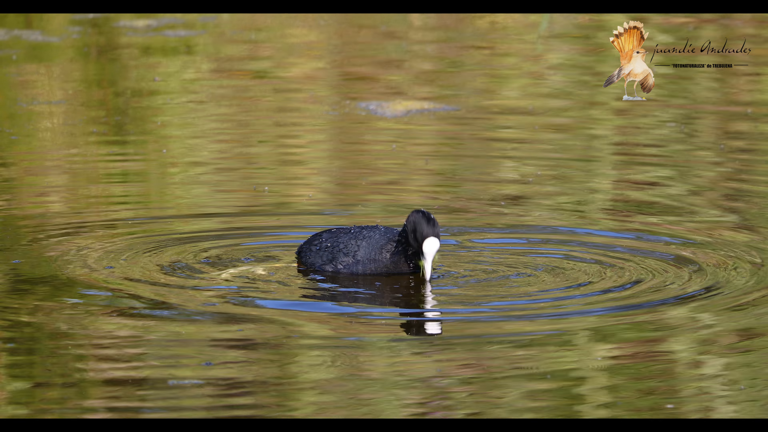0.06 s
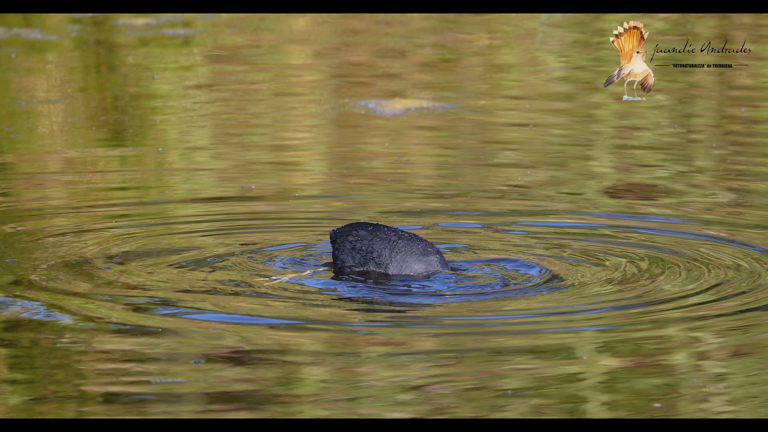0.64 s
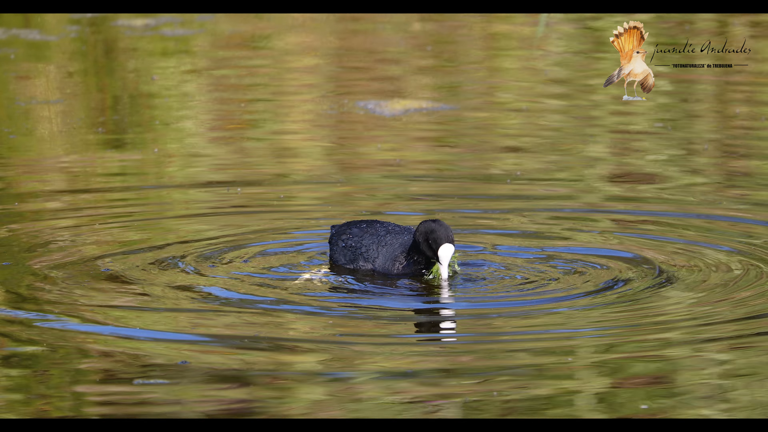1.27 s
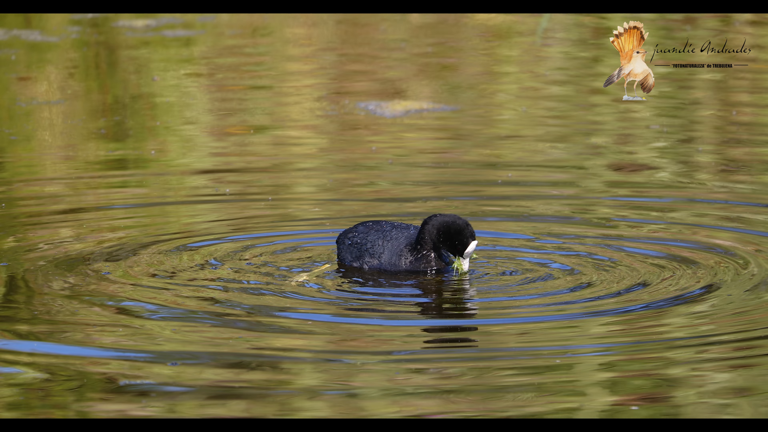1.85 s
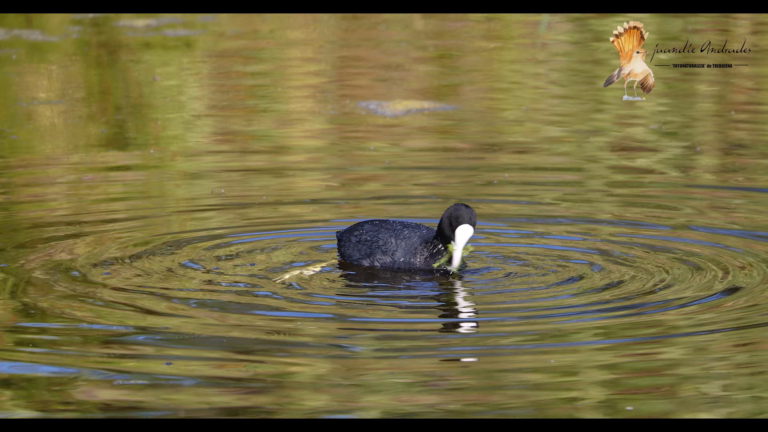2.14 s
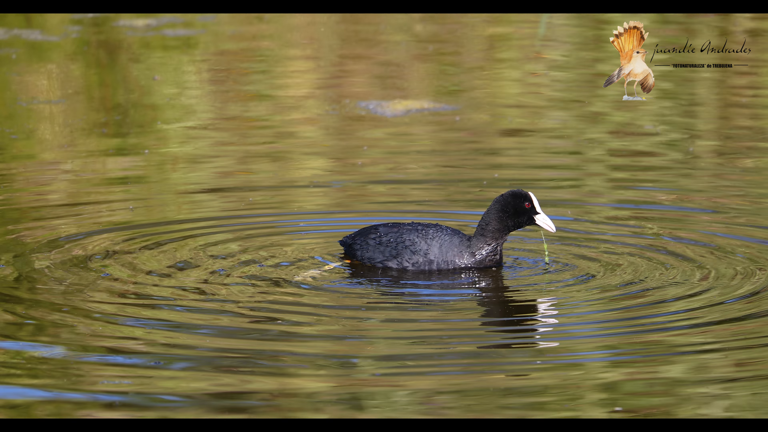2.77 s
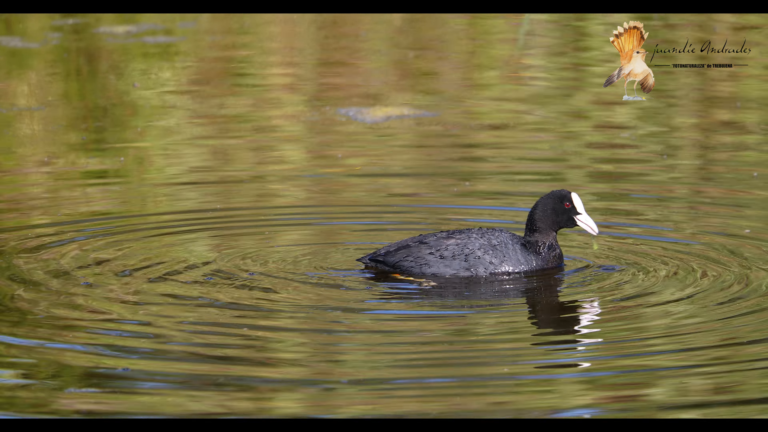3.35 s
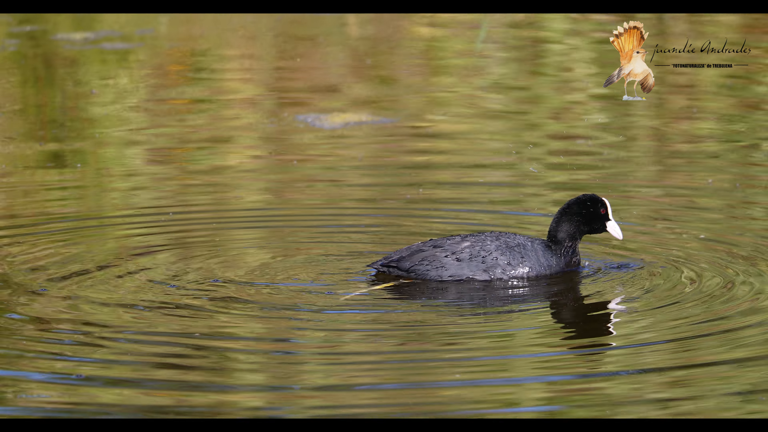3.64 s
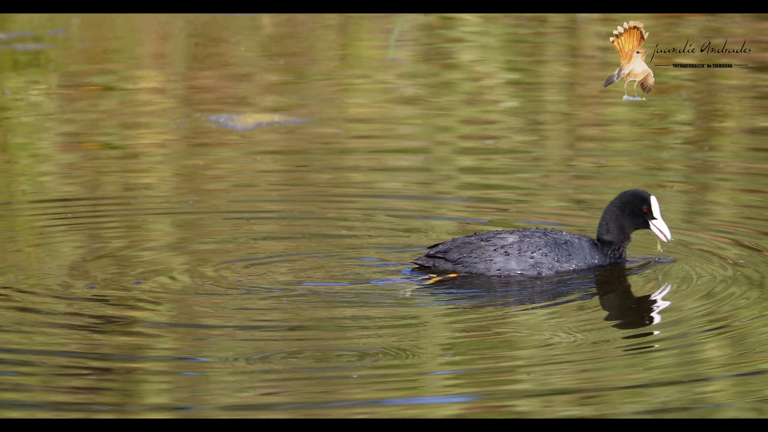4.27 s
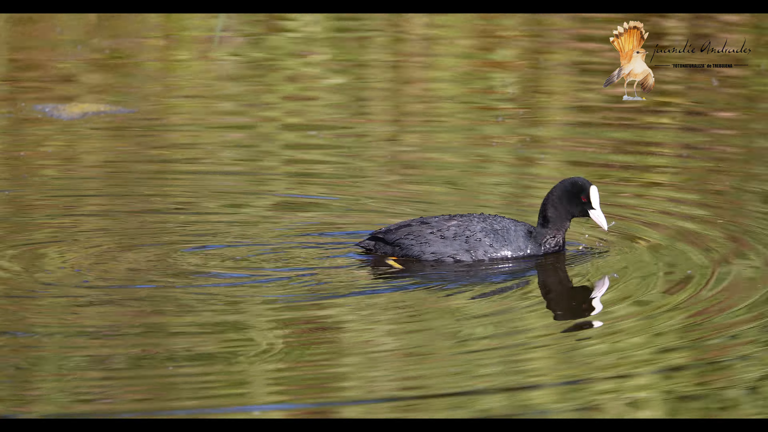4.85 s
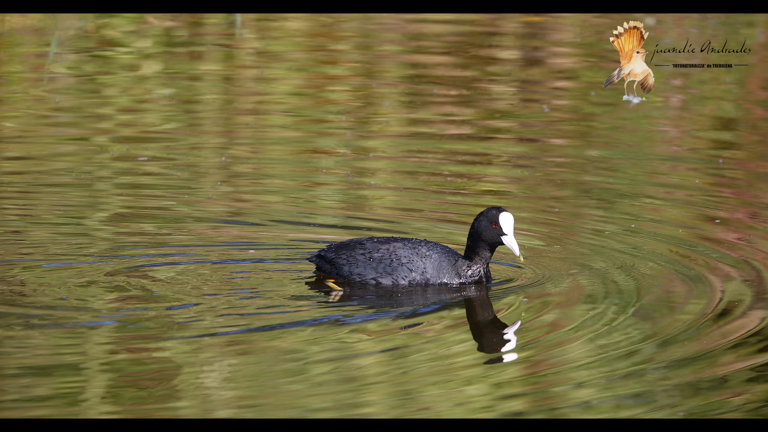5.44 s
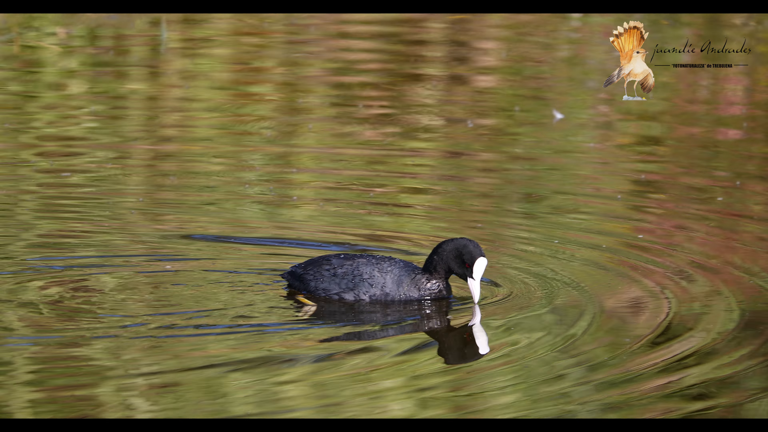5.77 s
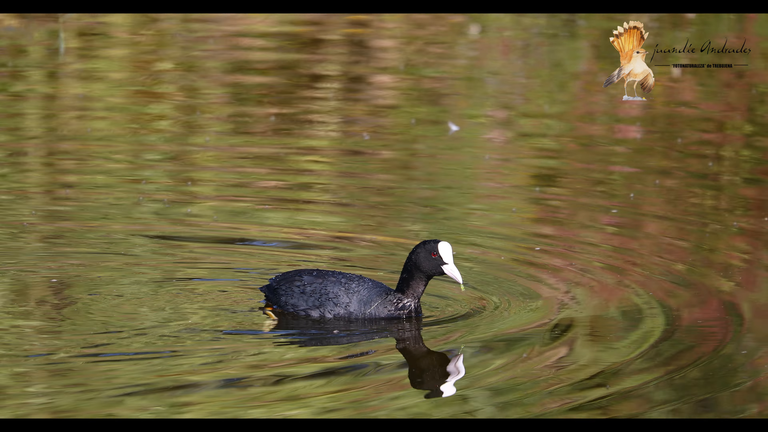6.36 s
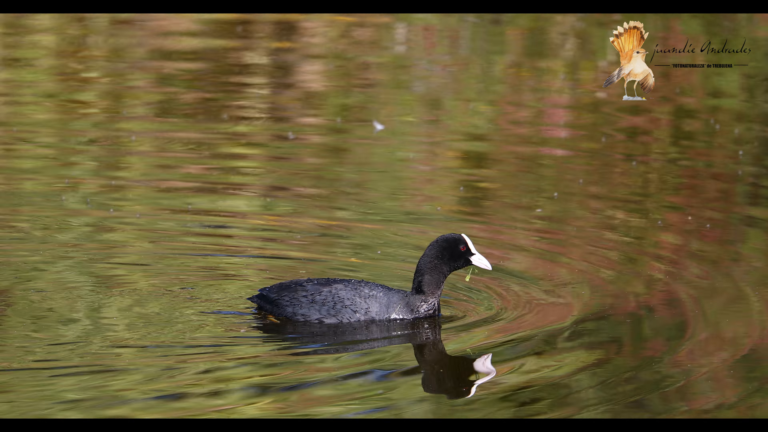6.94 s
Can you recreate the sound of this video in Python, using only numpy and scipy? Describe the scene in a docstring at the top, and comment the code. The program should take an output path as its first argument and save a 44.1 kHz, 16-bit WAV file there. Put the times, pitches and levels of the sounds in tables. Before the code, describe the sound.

Buzzy frog rattles, then close rising squeaks and trills, with loud double clucks and distant bird whistles over a low pond hush.

```python
"""Frogs at a calm pond.

A nearby frog squeaks in rising notes and trills, heard directly and off the water. Further along the
bank, other frogs rattle and croak with quick throat pulses, and small birds whistle far away. Two pairs
of sharp, hollow clucks sound close by, with soft bumps, ticks and rustles, over a low outdoor hush."""
import sys
import numpy as np
from scipy import signal
from scipy.fft import rfft, irfft
from scipy.io import wavfile
from scipy.ndimage import uniform_filter1d

SR = 44100
rng = np.random.default_rng(int(sys.argv[2]) if len(sys.argv) > 2 else 0)


def transcribe(signal):
    """Save signal, clipped to [-1, 1], as a 16-bit WAV file at the path in sys.argv[1]."""
    frames = np.atleast_2d(signal).T
    limited = np.clip(frames, -1, 1)
    pcm = np.round(limited * 32767).astype(np.int16)
    wavfile.write(sys.argv[1], SR, pcm)


N = 309141
T = np.arange(N) / SR


def gain(db):
    """Turn decibels into a number to multiply by."""
    return 10 ** (np.asarray(db) / 20)


def unit(x):
    """Scale a signal to an average strength (rms) of 1."""
    return x / np.sqrt(np.mean(x ** 2) + 1e-20)


def curve(rows):
    """Join (time, value) rows with straight lines."""
    return np.interp(T, *np.transpose(rows))


def seconds(length):
    """The time axis of one short sound."""
    return np.arange(int(length * SR)) / SR


def add(out, start, x):
    """Mix x into out from the given time."""
    i = max(int(start * SR), 0)
    out[i:i + len(x)] += x[:max(N - i, 0)]


def noise(colour):
    """Noise of strength 1, coloured by (frequency, level) rows."""
    hz, db = np.transpose(colour)
    freqs = np.maximum(np.fft.rfftfreq(N, 1 / SR), 1)
    shape = gain(np.interp(np.log(freqs), np.log(hz), db))
    return unit(irfft(rfft(rng.standard_normal(N)) * shape, N))


def band(x, hz, width_hz):
    """Keep the part of x near one pitch."""
    return signal.lfilter(*signal.iirpeak(hz, hz / width_hz, SR), x)


def wander(rate):
    """A smooth random wobble of strength 1 that turns rate times a second."""
    hold = max(int(SR / rate), 1)
    steps = np.repeat(rng.standard_normal(N // hold + 1), hold)[:N]
    return unit(uniform_filter1d(steps, hold))


def ring(t, hz, width_hz):
    """A tone that swells quickly and dies away; the wider, the shorter."""
    age = np.pi * width_hz * t
    return age * np.exp(1 - age) * np.sin(2 * np.pi * hz * t)


def pond_echo(x, fade_s, build_s):
    """Reeds and trees scatter sound into a soft echo that drops 60 dB in fade_s."""
    t = seconds(.8)
    tail = rng.standard_normal(len(t)) * gain(-60 * t / fade_s) * (1 - np.exp(-(t / build_s) ** 2))
    return signal.fftconvolve(x, tail / np.sqrt(np.sum(tail ** 2)))[:N]


# Tone colour of the hush: f/Hz, level/dB
HUSH_COLOUR = [(20, -9), (50, -9.5), (100, -3), (250, -1.5), (400, -1), (560, -4.5), (900, -1), (1270, -7),
               (1700, -7.5), (2200, -11), (3200, -13), (5000, -20), (7200, -28), (12500, -23.5)]
# How the far drone swells: t/s, relative level/dB
DRONE_SWELL = [(0, -71), (1.3, -79), (1.75, -59), (2.1, -67.5), (4.1, -64), (4.4, -59.5), (5.3, -56),
               (5.7, -63), (7, -67.5)]
# Its tone colour: f/Hz, level/dB
DRONE_COLOUR = [(50, -18), (130, -8), (280, 2), (450, -6.5), (600, -28), (900, -40)]
# How the whine comes and goes: t/s, relative level/dB
WHINE_SWELL = [(0, -80), (.45, -66.5), (.8, -71), (3.8, -74), (4.5, -63.5), (5.1, -67), (5.75, -75.5),
               (6.15, -65.5), (6.75, -61.5), (6.87, -75)]


def outdoors(hush_db=-60.5, hum_db=-70, whine_hz=996):
    """A steady hush, a low far drone, a faint hum and a thin, wavering whine."""
    hush = gain(hush_db + .077 * wander(11)) * noise(HUSH_COLOUR)
    drone = gain(curve(DRONE_SWELL) - 6 + 2.5 * wander(5.5)) * noise(DRONE_COLOUR)
    air = rng.standard_normal(N)
    hum = sum(band(band(air, hz, width), hz, width) for hz, width in [(740, 77), (854, 120), (1004, 97)])
    whine = np.sqrt(2) * np.sin(2 * np.pi * np.cumsum(whine_hz + 10 * wander(80)) / SR)
    hum = gain(hum_db + .51 * wander(12)) * unit(hum)
    whine *= gain(curve(WHINE_SWELL) - 1 + 2.4 * wander(25))
    return hush + drone + hum + whine


# Strength of the breeze: t/s, level/dB
BREEZE_SWELL = [(0, -78.5), (1.3, -78.5), (1.75, -69), (2.1, -103), (4, -85), (7, -88)]
# Its tone colour: f/Hz, level/dB
BREEZE_COLOUR = [(15, -24), (35, -2.5), (55, -2), (90, -11.5), (250, -41), (1000, -85)]


def breeze():
    """Light wind on the microphone makes a deep rumble."""
    return gain(curve(BREEZE_SWELL)) * noise(BREEZE_COLOUR)


# Rattles, each a row of short syllables: first t/s, last t/s, number of syllables, opening level/dB,
# middle level/dB, closing level/dB, throat f/Hz, its drop by the end/Hz, last pulse gap/s
RATTLE_BOUTS = [(.025, 0.485, 12, -52, -47, -47.5, 2340, 0, .0068),
                (0.566, .725, 5, -47.5, -39.5, -41, 2000, 388, 0.0052),
                (6.705, 6.923, 7, -50.5, -48, -49, 2060, 50, .0068)]


def rattling_frogs(pulses=4, gap_ratio=.75, snap_db=-5, snap_hz=1900):
    """Each syllable is a few throat pulses that grow louder and further apart."""
    out, t = np.zeros(N), seconds(.012)
    snap = gain(snap_db) * ring(t, snap_hz, width_hz=1200)
    for first, last, syllables, *levels_db, throat_hz, drop_hz, gap in RATTLE_BOUTS:
        # a rattle swells, slows a little and sags in pitch at its end
        for along in np.linspace(0, 1, syllables):
            db = np.polyval(np.polyfit([0, .5, 1], levels_db, 2), along)
            at = first + (last - first) * along ** 1.04
            hz = throat_hz - drop_hz * along ** 3
            width_hz = 560 * gain(.23 * (db + 34))  # forceful pulses snap shorter
            for k, (chance_db, detune) in enumerate(rng.standard_normal((pulses, 2))):
                pulse = ring(t, hz * (1 + .04 * detune), width_hz) + snap
                add(out, at, gain(db - k ** 2 + chance_db) * pulse)
                at -= gap * gap_ratio ** k  # work backwards from the last pulse
    return out


def whistle(length, pitches_hz, waver, quaver_hz=42, foliage_hz=5160):
    """One bird note sliding through three pitches; steep slides quaver, level ones stay smooth."""
    t = seconds(length)
    hz = np.polyval(np.polyfit([0, length / 2, length], pitches_hz, 2), t)
    steepness = np.tanh(np.mean(np.abs(np.diff(hz))) * SR / 28000) ** 2
    quaver = .057 * steepness * np.sin(2 * np.pi * quaver_hz * t + np.pi * waver[0])
    warble = .0168 * (.21 + steepness) * waver[:len(t)]
    phase = 2 * np.pi * np.cumsum(hz * (1 + quaver + warble)) / SR
    through_trees = unit(1 / np.sqrt(1 + (hz / foliage_hz) ** 8))  # trees dull the note's highest part
    return np.sqrt(2) * through_trees * signal.windows.tukey(len(t), .3) * np.sin(phase)


# Falling bird notes: t/s, length/s, first f/Hz, last f/Hz, relative level/dB
FALLING_NOTES = [(.05, .035, 3650, 2740, -68), (0.26, 0.039, 6530, 4620, -71),
                 (0.293, 0.11, 3670, 1400, -70), (.565, 0.03, 4700, 3380, -72),
                 (.84, 0.043, 6400, 4500, -76), (1.19, 0.053, 5000, 3150, -71),
                 (1.297, 0.066, 4580, 2900, -68), (1.372, 0.046, 6440, 4470, -72.5),
                 (1.918, .04, 5700, 3580, -69), (1.974, .035, 3550, 3080, -68),
                 (2.163, 0.041, 6340, 5250, -75), (2.335, .045, 3400, 2790, -70.5),
                 (2.685, 0.055, 6500, 4200, -75.5), (2.875, 0.042, 5360, 3700, -70.5),
                 (2.935, 0.066, 5300, 3070, -70), (3.111, .075, 5300, 4280, -73.5),
                 (3.118, .11, 4600, 3490, -73.5), (3.104, 0.07, 3570, 2920, -71),
                 (3.235, .1, 3180, 1560, -73.5), (3.38, 0.07, 6560, 3920, -78),
                 (4.585, 0.08, 5700, 2860, -65), (5.217, .05, 5860, 3840, -70),
                 (5.293, .025, 3900, 3100, -62.5), (5.789, .04, 5410, 3690, -69.5),
                 (5.85, .07, 4280, 2800, -70.5), (6.568, 0.058, 5120, 3300, -72)]
# Bird notes that settle on a pitch: same columns
SETTLING_NOTES = [(.465, .085, 4680, 3950, -76), (0.605, 0.029, 2950, 3150, -65),
                  (1.367, 0.2, 2436, 3034, -73.5), (1.443, 0.023, 1850, 1765, -66),
                  (1.816, 0.094, 4200, 4390, -79), (1.954, 0.036, 3900, 4080, -63),
                  (2.632, 0.093, 3170, 2997, -69.5), (3.359, .025, 2900, 3370, -65),
                  (3.981, 0.12, 5500, 4840, -74.5), (4.36, .036, 5150, 4960, -72),
                  (5.267, 0.031, 3770, 4150, -61), (6.742, .035, 2740, 2470, -64.5)]
# Loudness of the faint birds behind: t/s, relative level/dB
CHORUS_SWELL = [(0, -75), (1, -83), (1.7, -88), (2, -79), (2.7, -80.5), (3.1, -73.5), (4.4, -76),
                (6.2, -83), (6.7, -76)]


def far_birds(chorus_notes=240):
    """Thin whistles, doubled and blurred by the trees, over fainter birds behind them."""
    notes, chorus, waver = np.zeros(N), np.zeros(N), wander(220)

    def sing(out, start, length, pitches_hz, db):
        add(out, start, gain(db) * whistle(length, pitches_hz, waver[int(start * SR):]))

    for table, slide_by_halfway in (FALLING_NOTES, .5), (SETTLING_NOTES, .75):
        for start, length, first_hz, last_hz, db in table:
            middle_hz = first_hz + slide_by_halfway * (last_hz - first_hz)
            sing(notes, start, length, (first_hz, middle_hz, last_hz), db)
    for k in range(3):  # one quick run of up-and-down chirps
        sing(notes, 4.399 + k * .049, length=.0256, pitches_hz=(4860, 5800, 4860), db=-69)
    for when, height, length, fall, loud in rng.random((chorus_notes, 5)):
        pitches_hz = (2000 + 3300 * height) * (1 - (.15 + .2 * fall) * np.array([0, .6, 1]))
        db = 2 + 6 * (loud - height)  # distance takes most from the highest notes
        sing(chorus, when * (T[-1] - .15), .01883 + .04 * length, pitches_hz, db)
    notes *= gain(2 * wander(120))
    bounces = gain(-4) * np.interp(T - .015, T, notes) + gain(-13.5) * np.interp(T - .031, T, notes)
    blur = pond_echo(gain(-1) * notes + gain(curve(CHORUS_SWELL)) * chorus, fade_s=.26, build_s=.0018)
    return gain(1.5) * (notes + bounces) + blur


def creak(length, hz, rate_hz, width_hz):
    """Uneven pulses, each making a frog's throat ring at hz."""
    t = seconds(length)
    cycles = np.cumsum(rate_hz * (1 + .13 * wander(300)[:len(t)])) / SR
    pulses = np.diff(np.floor(cycles), prepend=-1)
    sizes = gain(3.3 * rng.standard_normal(len(t)))
    return unit(signal.fftconvolve(pulses * sizes, ring(t, hz, width_hz))[:len(t)])


# Far croaks: t/s, length/s, level/dB, throat f/Hz
FAR_CROAKS = [(0.349, 0.083, -59, 1710), (0.892, 0.012, -53.5, 2250), (0.963, 0.062, -58, 1900),
              (2.365, .025, -61, 1800), (2.448, 0.088, -61.5, 1800), (2.894, 0.2, -68.5, 1820),
              (3.295, 0.049, -57, 1680), (5.419, 0.049, -55, 1720), (5.782, 0.046, -55, 1060),
              (6.095, 0.034, -44.5, 1870)]


def croaking_frogs():
    """Each croak is a short throat creak that fades in and out."""
    out = np.zeros(N)
    for start, length, db, hz in FAR_CROAKS:
        croak = creak(length, hz, rate_hz=300, width_hz=590)
        add(out, start, gain(db) * croak * signal.windows.tukey(len(croak), .5))
    return out


# The impacts in the clucks: t/s, ring level/dB, main f/Hz, crack level/dB
CLUCK_IMPACTS = [(.9040, -26.5, 1170, -46), (.9150, -27.5, 882, -43), (0.9212, -23.5, 1052, -40.5),
                 (0.988, -25, 1110, -40.5), (0.993, -22, 1055, -41), (6.326, -26.5, 898, -39),
                 (6.3310, -18.5, 1075, -28.5), (6.4519, -26.5, 813, -33), (6.4550, -20, 1038, -36.5)]
# Tones of the hollow ring, retuned for each impact: f/Hz, width/Hz, relative level/dB
HOLLOW_TONES = [(131, 85, -18.5), (341, 135, -15.5), (789, 110, -9.5), (1088, 205, 1), (1335, 96, -19),
                (1780, 300, -22)]
# Tone colour of the crack: f/Hz, level/dB
CRACK_COLOUR = [(300, 15), (1500, -1.5), (2500, 0.5), (3600, 3.5), (5000, -5), (6400, -8), (7400, -0.5),
                (8800, -15.5), (10600, -10), (15000, -28)]


def clucks(hollow_main_hz=1067, crack_rise_s=.0005, crack_fade_s=.0023):
    """Each cluck is two or three quick impacts, each a dry crack and a hollow ring."""
    rings, cracks, t = np.zeros(N), np.zeros(N), seconds(.04)
    crack_shape = 2 * np.exp(-t / crack_fade_s) * (1 - np.exp(-t / crack_rise_s))
    for at, db, main_hz, crack_db in CLUCK_IMPACTS:
        tuning = main_hz / hollow_main_hz
        body = sum(gain(tone_db) * ring(t, hz * tuning, width) for hz, width, tone_db in HOLLOW_TONES)
        add(rings, at + .00036, gain(db) * body)
        # a harder contact also gives a low thump
        add(rings, at + .00038, gain(crack_db - 2.5) * ring(t, hz=180, width_hz=160))
        add(cracks, at, gain(crack_db) * crack_shape)
    bass_cut = signal.butter(4, 100, "high", fs=SR, output="sos")  # the clucks keep nothing below about 100 Hz
    out = signal.sosfilt(bass_cut, rings + cracks * noise(CRACK_COLOUR))
    return out + gain(-20) * pond_echo(band(out, 660, 2100), fade_s=.074, build_s=.021)


# Soft bumps: t/s, level/dB, fading time/s
SOFT_BUMPS = [(2.939, -52.5, 0.025), (4.001, -45, 0.0049), (4.313, -46, 0.0075), (4.335, -57, 0.05),
              (6.875, -51.5, 0.0041)]
# Their tone colour: f/Hz, level/dB
BUMP_COLOUR = [(50, -24), (130, 9), (350, -5), (550, -3), (900, 0), (1500, -11.5), (4000, -16),
               (12000, -44)]


def bumps():
    """Puffs of low noise that rise softly and die away."""
    loudness, t = np.zeros(N), seconds(.12)
    for at, db, fade in SOFT_BUMPS:
        add(loudness, at, gain(db) * 2 * np.exp(-t / fade) * (1 - np.exp(-2 * t / fade)))
    return loudness * noise(BUMP_COLOUR)


# Single squeaks, ending in an upward flick of pitch:
# start t/s, flick t/s, held f/Hz, level/dB, creak level relative to the squeak/dB
RISING_SQUEAKS = [(3.572, 3.634, 1964, -35.5, -12.5), (3.663, 3.712, 1963, -35, -31),
                  (4.177, 4.247, 1922, -36.5, -6.5), (4.272, 4.32, 1937, -36, -9.5),
                  (4.365, 4.412, 1877, -37.5, -12.5), (4.99, 5.059, 1902, -37.5, -12),
                  (5.09, 5.14, 1948, -36, -18), (6.089, 6.155, 1860, -36.5, -12.5),
                  (6.188, 6.239, 1927, -34.5, -19), (6.282, 6.328, 1860, -36, -9)]
# Trills, held squeaks with five flicks: first flick t/s, last flick t/s, held f/Hz, level/dB
SQUEAKY_TRILLS = [(4.659, 4.764, 1763, -40.5), (5.284, 5.39, 1760, -39.5), (5.724, 5.823, 1773, -39.5),
                  (6.534, 6.64, 1724, -38)]


def squeaking_frog(water_lag_s=.0022, water_share=.72, flick_s=.0041, flick_db=3, trill_creak_db=-12.5):
    """A pure squeak scoops up to its pitch and flicks higher; the throat creaks as pressure lets go."""
    calls = [(start, at + .0046, hz, db, creak_db, [(at, 2210)])  # a flick is (t/s, top f/Hz)
             for start, at, hz, db, creak_db in RISING_SQUEAKS]
    along = np.linspace(0, 1, 5)
    for first, last, hz, db in SQUEAKY_TRILLS:
        # the flicks come ever sooner and reach less high
        flicks = list(zip(first + (last - first) * along ** .88, 2294 - 280 * along ** 2.37))
        calls.append((first - .0555, last + .013, hz, db, trill_creak_db, flicks))
    out, waver, shimmer = np.zeros(N), wander(460), wander(320)
    for start, end, held_hz, db, creak_db, flicks in calls:
        t = seconds(end - start)
        here = int(start * SR) + np.arange(len(t))
        scoop = .136 * np.exp(-t / .009) + .1024 * np.exp(-t / .0219)
        sag = .0393 * (t / .137) ** 4
        hz = held_hz * (1 - scoop - sag)
        level_db = db + .5 * shimmer[here]
        for at, top_hz in flicks:
            flick = 1 / (1 + ((start + t - at + water_lag_s / 2) / flick_s) ** 4)
            hz += (top_hz - hz) * flick
            level_db += flick_db * flick
        swell = np.tanh(t / .015) ** .74 * np.minimum((t[-1] - t) / .008, 1)
        phase = 2 * np.pi * np.cumsum(hz * (1 + .0053 * waver[here])) / SR
        add(out, start, np.sqrt(2) * swell * gain(level_db) * np.sin(phase))
        rasp = creak(.03, held_hz, rate_hz=290, width_hz=750) * np.exp(-seconds(.03) / .02)
        add(out, end - .004, gain(db + creak_db) * rasp)
    # the reflection off the water cancels certain pitches, so each flick stutters
    heard = (out + water_share * np.interp(T - water_lag_s, T, out)) / (1 + water_share)
    return heard + gain(-25) * pond_echo(heard, fade_s=.3, build_s=.017)


# Dry ticks: t/s, level/dB
DRY_TICKS = [(3.649, -57), (4.3155, -52), (4.359, -54), (5.032, -42.5), (5.566, -60), (5.869, -55),
             (6.520, -58), (6.838, -48.5)]
# Their tone colour: f/Hz, level/dB
TICK_COLOUR = [(2000, -8), (5000, -11.5), (8000, -8.5), (12000, -3), (15000, -10)]


def ticks(fade_s=.00081):
    """Tiny bursts of bright noise that vanish at once."""
    loudness, t = np.zeros(N), seconds(.12)
    for at, db in DRY_TICKS:
        add(loudness, at, gain(db) * np.exp(-t / fade_s))
    return loudness * noise(TICK_COLOUR)


# Swishes of rustle: t/s, length/s, relative level/dB
SWISHES = [(4.324, 0.15, -59), (4.457, 0.18, -63.5), (4.77, 0.191, -56), (5.554, 0.097, -62)]
# Their tone colour: f/Hz, level/dB
RUSTLE_COLOUR = [(400, 4), (1500, 5.5), (3500, 1.5), (6000, -9), (12000, -10), (15500, -22)]


def rustle(growth_db=4, patchy_db=2):
    """Light, patchy swishes of noise, each growing until it stops."""
    loudness = np.zeros(N)
    for at, length, db in SWISHES:
        along = seconds(length) / length
        add(loudness, at, gain(db - growth_db * (1.5 - along)) * signal.windows.tukey(len(along), .25))
    return loudness * gain(patchy_db * wander(250)) * noise(RUSTLE_COLOUR)


def scene():
    """Everything heard from one spot on the bank."""
    near_frog = squeaking_frog()
    far_frogs = rattling_frogs() + croaking_frogs()
    far_frogs += gain(-20) * pond_echo(far_frogs, fade_s=.2, build_s=.014)
    mix = near_frog + far_frogs + clucks() + far_birds()
    return (mix + rustle() + breeze() + bumps() + ticks() + outdoors())[None]


def record(dry, top_hz=15650):
    """Cut away the very highest treble."""
    return signal.sosfilt(signal.ellip(12, .1, 70, top_hz, fs=SR, output="sos"), dry)


dry = scene()
out = record(dry)
transcribe(out)
```